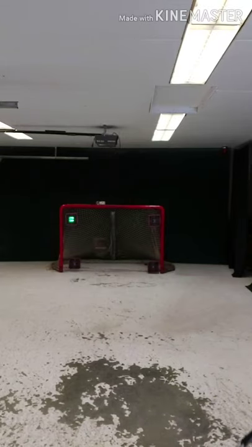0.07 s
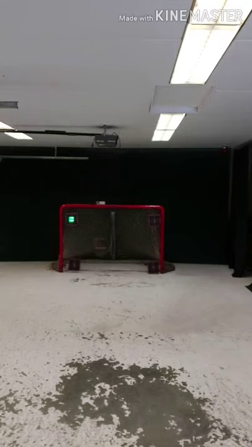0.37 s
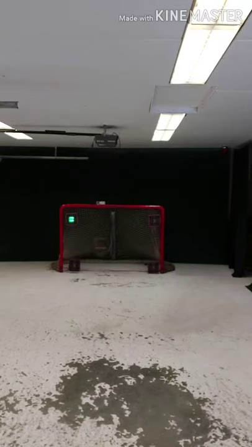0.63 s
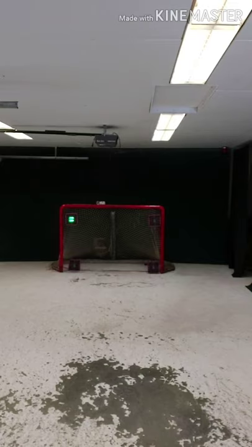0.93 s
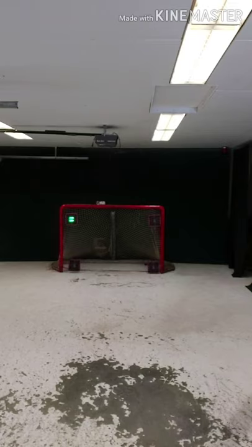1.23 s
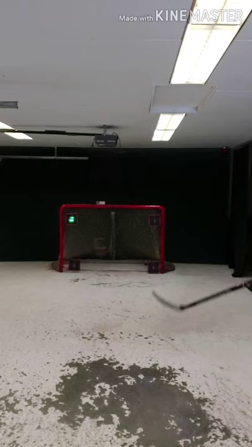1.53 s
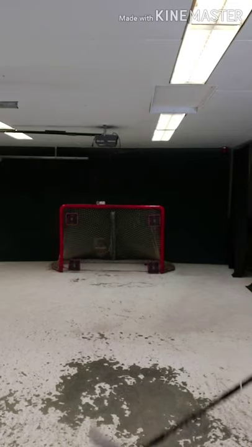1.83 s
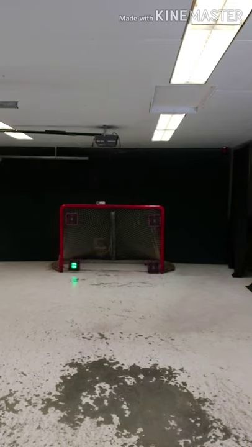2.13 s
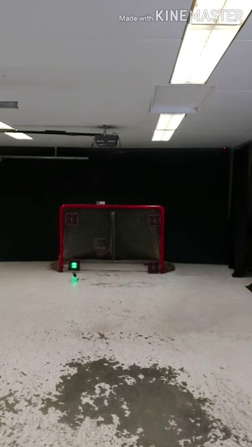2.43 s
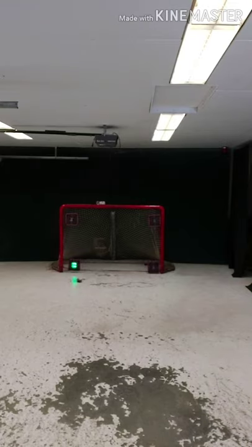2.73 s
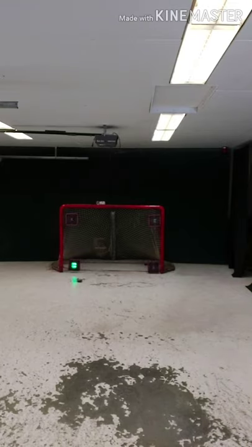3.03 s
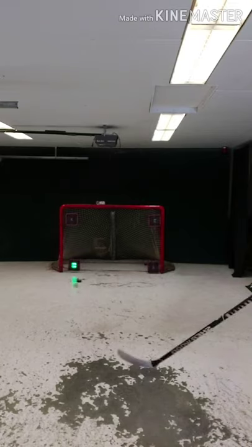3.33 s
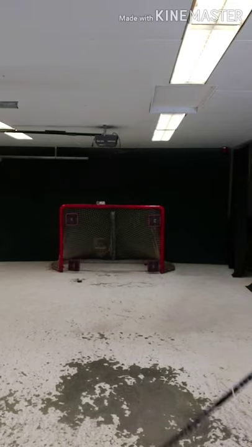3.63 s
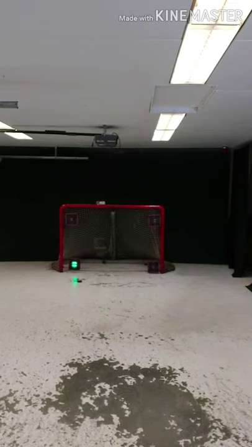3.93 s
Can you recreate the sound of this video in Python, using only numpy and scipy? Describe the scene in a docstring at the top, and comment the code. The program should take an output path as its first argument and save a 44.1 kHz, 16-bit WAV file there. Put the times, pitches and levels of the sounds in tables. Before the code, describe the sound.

Two hockey shots crack through a hard-walled indoor room. Each starts with a nearby stick clacking and scraping a puck over plastic flooring, and ends with a hollow, ringing hit at the distant goal. Soft thuds fall in between.

```python
"""Hockey shooting practice on a plastic rink floor, in a hard-walled room that rings after every sound.
First a nearby stick taps and drags a puck while feet thud and another puck knocks at the far end.
At about 1.4 s the blade chatters along the floor and whips the puck away; it cracks into the far goal.
More thuds, gliding and dragging lead to a second shot at about 3.3 s. It too sets the goal ringing,
and a few last knocks follow from the far end."""
import sys
import numpy as np
from scipy import signal
from scipy.fft import rfft, irfft
from scipy.io import wavfile
from scipy.ndimage import uniform_filter1d

SR = 44100
rng = np.random.default_rng(int(sys.argv[2]) if len(sys.argv) > 2 else 0)


def to_wav(sig):
    """Store sig (one row per channel, or 1-D mono) as 16-bit WAV at the path in sys.argv[1].

    Samples outside -1..1 are clipped; the rate is SR.
    """
    pcm = np.clip(np.atleast_2d(sig), -1, 1) * 32767
    pcm = np.round(pcm).astype(np.int16)
    wavfile.write(sys.argv[1], SR, pcm.T)  # frames by channels


N = 176400

# the notes at which the stick blade rings (pitch [Hz], level [dB])
BLADE_NOTES = [(2240, -4.5), (3130, -14.5), (4250, -6), (5480, -18)]
BLADE_HZ = BLADE_NOTES[0][0]


def amp(db):
    """Turns decibels into a factor to multiply by."""
    return 10 ** (np.asarray(db) / 20)


def unit_power(x):
    """Scales a signal to an average power of 1."""
    return x / np.sqrt(np.mean(x ** 2) + 1e-20)


def value_at(points, hz):
    """Looks up a (frequency, value) table, with every octave equally wide."""
    table_hz, value = np.transpose(points)
    return np.interp(np.log(hz + 1), np.log(table_hz + 1), value)


def add(mix, start_s, sound):
    """Adds a sound to the stereo mix at the given time."""
    part = mix[:, max(round(start_s * SR), 0):][:, :sound.shape[1]]
    part += sound[:, :part.shape[1]]


def convolve(x, response):
    """Filters a sound: each of its samples sets off a copy of the response."""
    return signal.fftconvolve(np.atleast_2d(x), np.atleast_2d(response), axes=1)


def click(spectrum, colour=None, tilt_db=0, pivot_hz=2000, size=4096):
    """A short pulse with this spectrum; colour and tilt (dB per octave) turn parts of it up or down."""
    hz = np.abs(np.fft.fftfreq(size, 1 / SR))
    octaves = np.log2(np.maximum(hz, 100) / pivot_hz)
    gain = unit_power(amp(value_at(spectrum, hz))) * amp(tilt_db * octaves)
    if colour is not None:
        gain = gain * amp(value_at(colour, hz))
    # minimum phase: packs the energy at the start of the pulse
    log_spectrum = np.conj(signal.hilbert(np.log(gain + 1e-6)))
    return np.fft.ifft(np.exp(log_spectrum)).real[:size // 2]


def mic_pair(noise):
    """Makes two unrelated channels alike in the bass, as two close microphones hear a room."""
    # how alike left and right are (frequency [Hz], likeness [-1 to 1])
    likeness = [(150, 0.93), (300, 0.92), (550, 0.85), (1000, -0.2), (1600, -0.32), (3000, -0.075)]
    common, separate = rfft(noise)
    same = np.clip(value_at(likeness, np.fft.rfftfreq(noise.shape[1], 1 / SR)), -1, 1)
    left = same * common + np.sqrt(1 - same ** 2) * separate
    return irfft(np.array([left, common]), noise.shape[1])


def room_tail(hold_s=0, early_db=0):
    """One second of dense echoes that barely fade for hold_s, then die away, the treble first."""
    # how long the room rings (frequency [Hz], time to fade by 60 dB [s])
    fade_times = [(60, 0.36), (260, 0.57), (700, 0.62), (2300, 0.53), (4850, 0.46), (12800, 0.27)]
    early_peak_s, held_fade_speed = 0.012, 0.11
    delay = np.arange(SR) / SR / early_peak_s
    early_swell = amp(early_db * delay * np.exp(1 - delay))
    echoes = mic_pair(rng.standard_normal((2, SR)) * early_swell)
    hz, age, bands = signal.stft(echoes, SR, nperseg=256)
    age = age - (1 - held_fade_speed) * np.minimum(age, hold_s)
    fade = np.exp(-np.log(1000) * age / value_at(fade_times, hz)[:, None])
    return signal.istft(bands * fade, SR, nperseg=256)[1][:, :SR]


def in_room(x, direct_db, room_db=0):
    """A near sound arrives directly, then off the floor, while the room's echoes build up."""
    floor_echo_s, floor_echo_db = 0.0078, -9.5
    build_up = np.minimum(np.arange(SR) / SR / floor_echo_s, 1)
    response = amp(room_db) * unit_power(room_tail()) / np.sqrt(SR) * build_up
    response[:, 0] += amp(direct_db)
    response[:, round(floor_echo_s * SR)] += amp(direct_db + floor_echo_db)
    return convolve(x, response)


def ring(hz, fade_s, length_s=1, phase=0):
    """One note of a struck object, dropping by 60 dB in fade_s."""
    t = np.arange(round(length_s * SR)) / SR
    return np.sin(2 * np.pi * hz * t + phase) * np.exp(-np.log(1000) * t / fade_s)


def room_tone():
    """The quiet, steady rumble and hiss of the room."""
    # tone of the background noise (frequency [Hz], level [dB])
    spectrum = [(20, -16), (60, 23), (400, -8), (2300, 0.5), (4000, -6), (15000, -7)]
    noise = mic_pair(rng.standard_normal((2, N)))
    return amp(-67.5) * convolve(noise, click(spectrum))[:, :N]


def gritty_noise(swells, spectrum, grain_db):
    """Noise that jumps in level from grain to grain, and rises and falls with each swell."""
    t, grain_samples = np.arange(N) / SR, 60
    power = sum(amp(db) ** 2 * np.exp(-((t - middle_s) / half_s) ** 2) for middle_s, half_s, db in swells)
    jumps = np.clip(rng.standard_normal(N // grain_samples + 1), -2, 2)
    grains = amp(grain_db * jumps).repeat(grain_samples)[:N]
    noise = unit_power(grains * rng.standard_normal(N)) * np.sqrt(power)
    return in_room(convolve(noise, click(spectrum)), direct_db=-8)[:, :N]


def high_hiss():
    """High hiss: the sound of gliding on the plastic, and also a short burst just after each shot."""
    # each swell of hiss (middle [s], half length [s], level [dB])
    swells = [(.22, 0.014, -51), (.55, 0.058, -53.5), (1.27, 0.1, -45), (1.56, 0.019, -45.5),
              (2.25, 0.045, -54.5), (2.40, 0.053, -45.5), (2.695, 0.027, -53), (3.0, 0.11, -55),
              (3.23, 0.16, -49.5), (3.42, 0.08, -50.5)]
    # tone of the hiss (frequency [Hz], level [dB])
    spectrum = [(100, -71), (1500, 9.5), (5600, 6.5), (7500, -1), (9500, 2), (12000, 7.5), (15000, 1)]
    return gritty_noise(swells, spectrum, grain_db=4.5)


def puck_drags():
    """The puck scrapes roughly as it is dragged over the floor."""
    # each drag (middle [s], half length [s], level [dB])
    strokes = [(0, 0.0057, -34.5), (.58, 0.084, -42.5), (1.18, 0.09, -41), (2.38, 0.058, -47.5),
               (2.54, 0.058, -38), (2.7, 0.3, -56.5), (3.05, 0.11, -44), (3.19, 0.069, -39)]
    # tone of the scrape (frequency [Hz], level [dB])
    spectrum = [(50, -25), (250, -13.5), (600, -11.5), (900, 0), (1600, 3), (2400, 7), (3000, -4.5),
                (4500, -16), (8000, -22.5), (15000, -36)]
    return gritty_noise(strokes, spectrum, grain_db=10.5)


def floor_squeaks():
    """Something sticks and slips on the floor, making brief, unsteady tones that rise."""
    # each squeak (start [s], length [s], pitch [Hz], level [dB])
    squeaks = [(0.786, 0.011, 4090, -44), (1.171, 0.037, 999, -33.5), (1.361, 0.021, 4070, -31.5)]
    wobble, rise_per_s = 0.015, 4.8  # as shares of the pitch
    out = np.zeros((2, N))
    for start_s, length_s, hz, db in squeaks:
        t = np.arange(round(length_s * SR)) / SR
        wander = unit_power(uniform_filter1d(rng.standard_normal(SR), size=40))[:len(t)]
        pitch = hz * (1 + wobble * wander + rise_per_s * (t - length_s / 2))
        tone = np.hanning(len(t)) * np.sin(2 * np.pi * np.cumsum(pitch) / SR)
        add(out, start_s, amp(db) * in_room(tone, direct_db=-3.5, room_db=-5))
    return out


def floor_thuds():
    """Feet and dropped pucks meet the floor with dull, heavy thuds."""
    # each thud (time [s], level [dB], tilt towards treble [dB per octave])
    thuds = [(.002, -45.5, 2.5), (.114, -39, 2.5), (0.784, -44.5, 2.5), (0.831, -40.5, 3),
             (1.063, -41, 2.5), (2.317, -51, 4), (2.410, -36, 0.1), (2.692, -46, -1.5), (2.93, -48.5, -1.5),
             (1.364, -31, 5.5), (3.271, -41, -4)]
    # tone of a thud (frequency [Hz], level [dB])
    spectrum = [(40, -15), (150, -1.5), (330, 0.5), (480, -3.5), (700, 0), (1100, -12), (2200, -10.5),
                (4000, -26), (15000, -55.5)]
    out = np.zeros((2, N))
    for start_s, db, tilt_db in thuds:
        pulse = click(spectrum, tilt_db=tilt_db, pivot_hz=480)
        add(out, start_s, amp(db) * convolve(room_tail(hold_s=0.017), pulse))
    return out


def puck_slaps():
    """A puck lands flat; the floor sheet bends and carries high notes ahead of low ones: a chirp."""
    # each landing (time [s], level [dB])
    landings = [(.367, -23), (3.875, -23)]
    from_hz, to_hz, fall_s, length_s = 2900, 588.7, 0.006, 0.035
    out, t = np.zeros((2, N)), np.arange(round(length_s * SR)) / SR
    pitch = to_hz + (from_hz - to_hz) * np.exp(-t / fall_s)
    swell = np.sqrt(np.sin(np.pi * np.arange(len(t)) / len(t)))
    chirp = swell * np.sin(2 * np.pi * np.cumsum(pitch) / SR)
    for start_s, db in landings:
        add(out, start_s, amp(db) * in_room(chirp, direct_db=-1))
    return out


def hollow_booms():
    """The goal, targets and floor give hollow notes when a puck hits; the goal frame rings longer."""
    # notes of hits and rebounds (time [s], pitch [Hz], level [dB])
    booms = [(.385, 735, -25), (1.702, 253, -17.5), (1.775, 530.5, -20.5), (3.6, 551.5, -17.5),
             (3.688, 275.6, -23.5), (3.876, 810, -22), (3.88, 624, -23.5)]
    # shots that set the goal frame ringing (time [s], level [dB])
    goal_hits = [(1.704, -34), (3.583, -42)]
    # notes of the goal frame (pitch [Hz], level [dB])
    frame_notes = [(157, -16.5), (335, -15.5), (525, -5), (575, 5), (770, -13), (925, -2)]
    out, rise_s = np.zeros((2, N)), 0.011
    rise = 1 - np.exp(-np.arange(SR)[None] / SR / rise_s)
    for start_s, hz, db in booms:
        add(out, start_s, amp(db) * rise * ring(hz, fade_s=0.29))
    for start_s, db in goal_hits:
        frame = sum(amp(note_db) * ring(hz, fade_s=0.65, phase=2 * np.pi * rng.random())
                    for hz, note_db in frame_notes)
        add(out, start_s, amp(db) * rise * frame)
    return out


def far_hits():
    """Pucks crack at the far end; each crack's echoes stay loud briefly, then fade."""
    # where each hit's tone is set (frequency [Hz])
    bands_hz = [100, 280, 520, 850, 2000, 5000, 12000]
    # each hit (time [s], hold length [s], then a level [dB] for each of bands_hz)
    hits = [(0.366, 0.034, -12, -7, -8, -4, -7.5, -7.5, -27.5),
            (1.7038, 0.065, 4, 1.5, -3.5, 2.5, -0.5, 1, -9.5), (3.583, 0.018, 7.5, 9, 10, 5, -0.5, 4.5, -8),
            (3.687, 0.03, -3, -2.5, -9, -6, -14.5, -11, -25),
            (3.873, 0.0058, -12, -2.5, -13.5, -1.5, -10.5, -18.5, -34)]
    # tone that all hits share (frequency [Hz], level [dB])
    spectrum = [(24, -66), (40, -21), (187, -13), (260, -10), (560, -5.5), (704, -7), (1120, -6.5),
                (2280, -0.5), (3500, -14.5), (5130, -21.5), (11500, -16), (14000, -27)]
    out = np.zeros((2, N))
    for start_s, hold_s, *bands_db in hits:
        crack = click(spectrum, list(zip(bands_hz, bands_db)))
        add(out, start_s, amp(-18) * convolve(room_tail(hold_s, early_db=3), crack))
    return out


def blade_ring(x, ring_db, pitch_hz):
    """The stick blade adds a short ring to whatever strikes it; the pitch depends on the spot hit."""
    notes = sum(amp(db) * ring(hz * pitch_hz / BLADE_HZ, fade_s=0.008, length_s=0.1, phase=np.pi / 2)
                for hz, db in BLADE_NOTES)
    response = amp(ring_db) * notes / 2
    response[0] += 1
    return convolve(x, response / np.linalg.norm(response))


def stick_taps():
    """The blade clacks on puck and floor: one push plus crushed grit, more of it in bright taps."""
    # each tap (time [s], level [dB], body [dB], treble [dB], blade pitch [Hz])
    taps = [(0.12, -7, -12, -4, 2380), (0.4588, 6, 1, -7, 2400), (0.5565, -6, 7, -4, 2220),
            (0.792, -8, -7, -3.5, 2360), (0.8355, -4, 4, 1, 2350), (0.8718, 0.5, -4.5, -9.5, 2480),
            (1.067, -16, 2, 7, 2370), (1.3625, 5.5, 10, -14, 1760), (1.3675, 8, 2.5, -38, 2020),
            (1.3845, 2.5, 13, -2, 1830), (1.3902, 11, 7.5, 15, 2480), (2.8154, -4, -1, 1, 1770),
            (3.2343, -2.5, 13.5, -3, 2290), (3.2385, 10.5, -0.5, 3.5, 2360), (3.275, 12, -4, -26, 2260),
            (3.288, 15, -10, -20.5, 2320)]
    # where body, middle and treble lie (frequency [Hz])
    bands_hz = [800, 2300, 7500]
    # tone of a tap (frequency [Hz], level [dB])
    spectrum = [(40, -32), (300, -20), (800, -5), (1400, -2.5), (2300, 2.5), (3100, -7.5), (4100, -13.5),
                (4900, -29), (5600, -19), (7500, -32.5), (15000, -31.5)]
    crush_s, grit_per_treble = 0.002, 0.25
    out, t = np.zeros((2, N)), np.arange(SR // 100) / SR
    push = t == 0
    for start_s, db, body_db, treble_db, pitch_hz in taps:
        grit = rng.standard_normal(len(t)) * np.exp(-t / crush_s)
        contact = push + amp(grit_per_treble * treble_db) * grit / np.linalg.norm(grit)
        pulse = click(spectrum, list(zip(bands_hz, [body_db, 0, treble_db])))
        knock = convolve(contact / np.linalg.norm(contact), pulse)
        clack = blade_ring(knock, ring_db=-16.5, pitch_hz=pitch_hz)
        add(out, start_s, amp(db - 5) * in_room(clack, direct_db=0, room_db=-1.5))
    return out


def stick_shots():
    """Pressed down for a shot, the blade skips along the floor in uneven slips that swell and let go."""
    # the scrapes that make up the two shots
    # (start [s], length [s], level [dB], slips [per s], blade ring [dB], body [dB], treble [dB])
    scrapes = [(1.247, 0.15, -33.5, 230, -20, -16.5, -3), (1.4, 0.053, -15.5, 190, -44, -2, 2),
               (1.463, 0.032, -20, 230, -43, -14, -3), (3.243, 0.047, -27, 170, -9, -2.5, 6.5),
               (3.275, 0.067, -27.5, 130, -7.5, 0.5, 0)]
    # tone of the chatter (frequency [Hz], level [dB])
    spectrum = [(25, -13), (90, -13), (330, -2), (480, -7), (850, 10), (1250, 3), (1800, 4.5), (2450, 6.5),
                (3000, -5), (4300, -11), (6500, -26.5), (15000, -27.5)]
    slip_fade_s = 0.0036
    out, t = np.zeros((2, N)), np.arange(SR // 4) / SR
    for start_s, length_s, db, rate, ring_db, body_db, treble_db in scrapes:
        drift, grit = rng.standard_normal((2, len(t)))
        wander = unit_power(uniform_filter1d(drift, size=200))
        slip_count = np.cumsum(rate * (1 + 0.25 * wander)) / SR
        since_slip_s = (slip_count % 1) / rate
        slips = unit_power(grit * (0.75 + np.exp(-since_slip_s / slip_fade_s)))
        swell = np.maximum(np.sin(np.pi * np.minimum(t / length_s, 1)), 0) ** 0.55
        pulse = click(spectrum, [(800, body_db), (2000, 0), (6000, treble_db)])
        chatter = blade_ring(convolve(slips * swell, pulse), ring_db, BLADE_HZ)
        add(out, start_s, amp(db) * in_room(chatter, direct_db=-0.5))
    return out


def scene():
    """Everything in the practice room, from the background to the stick."""
    floor = high_hiss() + puck_drags() + floor_squeaks() + floor_thuds() + puck_slaps()
    return room_tone() + floor + hollow_booms() + far_hits() + stick_taps() + stick_shots()


def record(dry):
    """The right microphone favours the upper mids; peaks are rounded off; the top treble is cut."""
    # balance of the microphones (frequency [Hz], left minus right [dB])
    balance = [(80, -2.5), (250, 0.5), (500, -4), (800, -5.5), (1200, -4), (1800, -14.5), (2700, -14.5),
               (4200, -4), (6400, -7.5), (9800, 5), (15000, 4.5)]
    ceiling, cutoff_hz = 1.03, 14650
    ratio = amp(value_at(balance, np.fft.rfftfreq(2 * N, 1 / SR)))
    gains = np.array([2 * ratio, np.full_like(ratio, 2)]) / (1 + ratio)
    heard = irfft(rfft(dry, 2 * N) * gains)[:, :N]
    rounded = ceiling * np.tanh(heard / ceiling)
    low_pass = signal.firwin(161, cutoff_hz, window=("kaiser", 8), fs=SR)
    return signal.oaconvolve(rounded, low_pass[None], "same")


dry = scene()
out = record(dry)
to_wav(out)
```